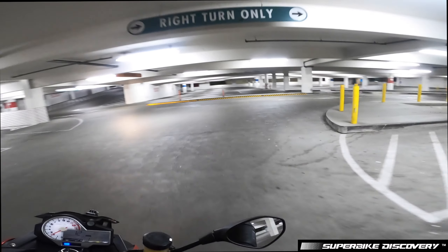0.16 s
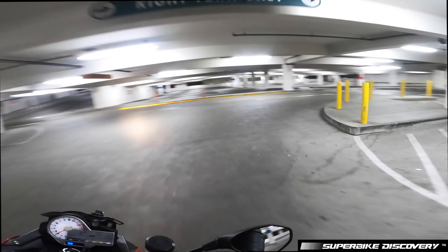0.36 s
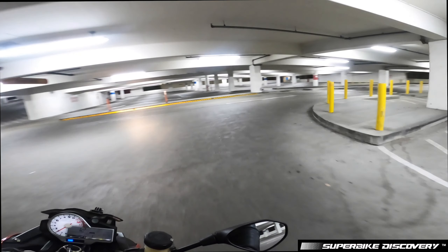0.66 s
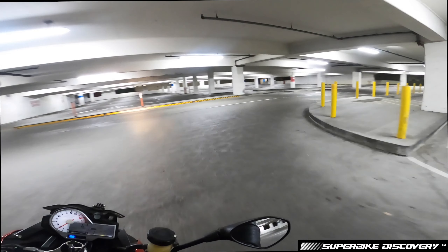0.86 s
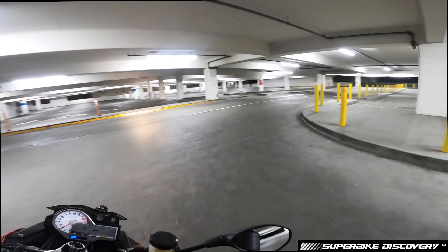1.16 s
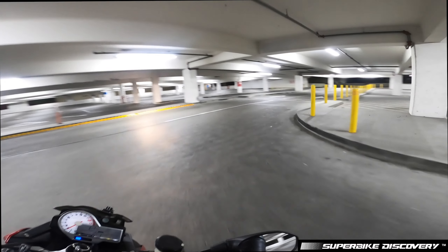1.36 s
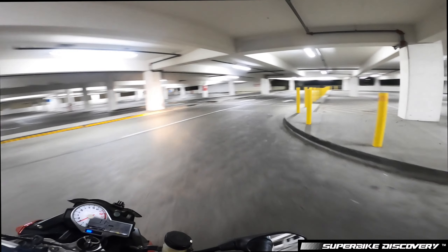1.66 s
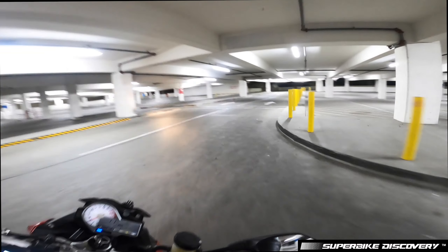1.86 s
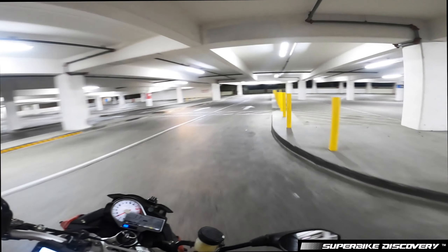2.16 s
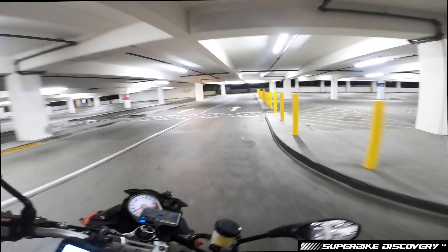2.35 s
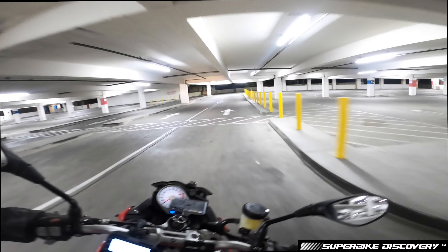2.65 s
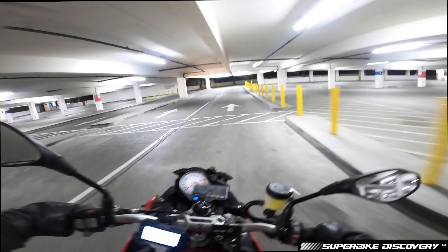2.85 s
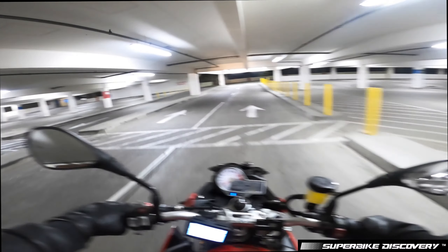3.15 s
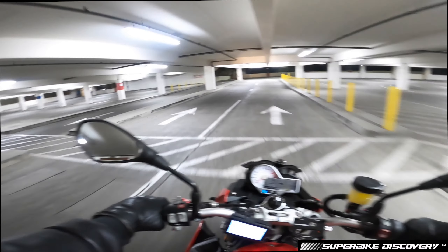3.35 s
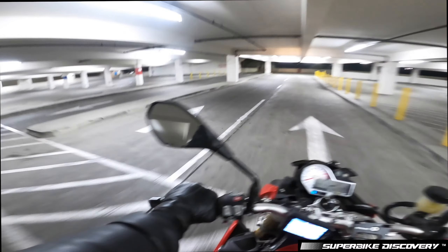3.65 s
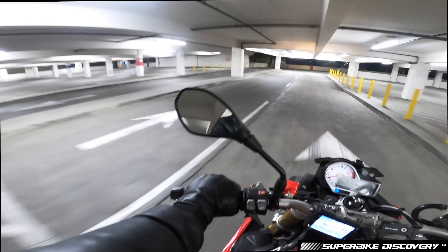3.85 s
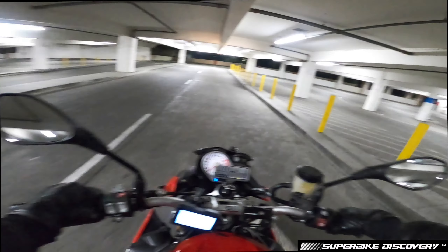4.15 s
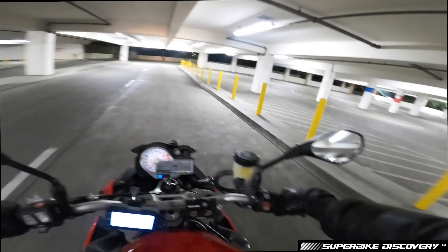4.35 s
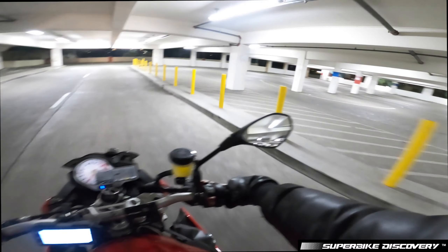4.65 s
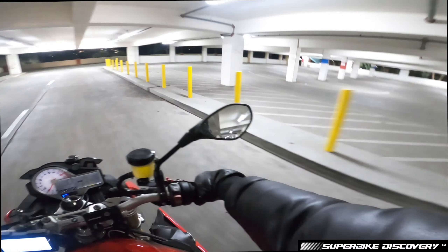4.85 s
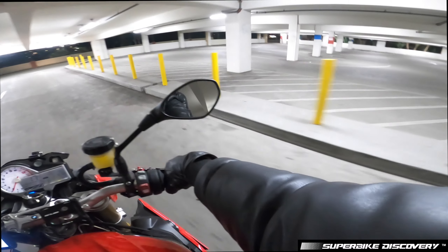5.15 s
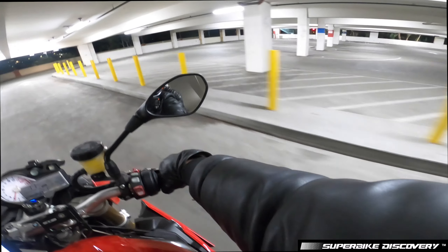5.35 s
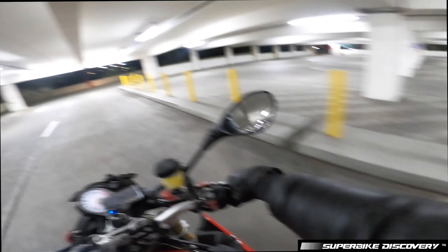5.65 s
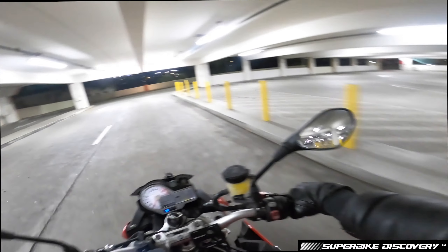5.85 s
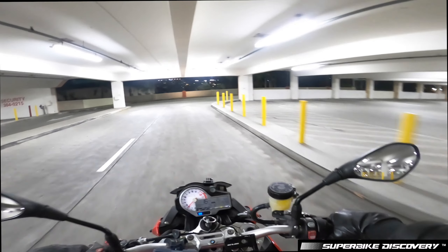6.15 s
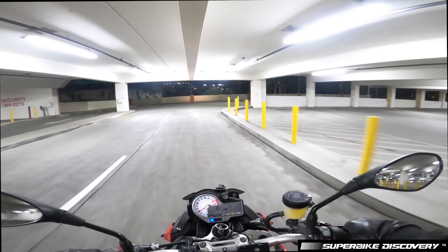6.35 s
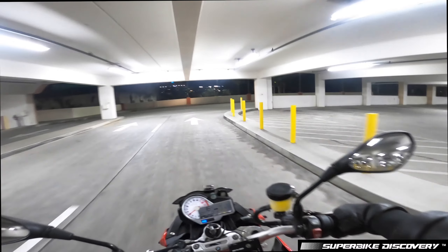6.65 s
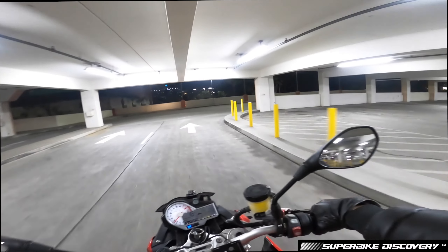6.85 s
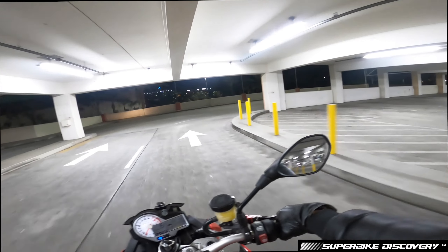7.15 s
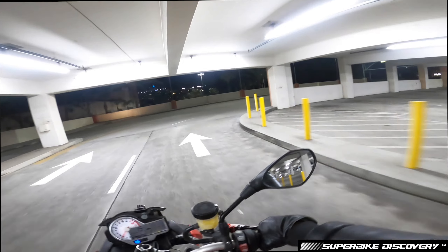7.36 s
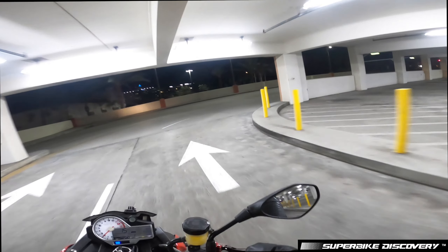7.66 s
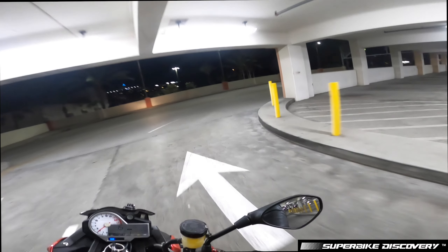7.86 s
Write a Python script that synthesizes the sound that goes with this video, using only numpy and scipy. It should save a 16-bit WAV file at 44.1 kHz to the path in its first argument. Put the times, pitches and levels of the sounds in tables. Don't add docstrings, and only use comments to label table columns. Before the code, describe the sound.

A four-cylinder motorcycle hums low and uneven through a concrete garage, blipping its throttle twice, under a broad helmet hiss.

```python
import sys
import numpy as np
from scipy import signal
from scipy.fft import rfft, irfft, next_fast_len
from scipy.io import wavfile
from scipy.ndimage import uniform_filter1d, map_coordinates

SR = 44100
rng = np.random.default_rng(int(sys.argv[2]) if len(sys.argv) > 2 else 0)


def to_linear_factor(level_db):
    exponent = np.asarray(level_db, float) / 20
    return 10 ** exponent


def materialize(psi):
    bounded = np.clip(np.atleast_2d(psi).T, -1, 1)
    quanta = np.round(bounded * 32767).astype(np.int16)
    wavfile.write(sys.argv[1], SR, quanta)


N = 352800

# start in
# seconds, end in seconds, first pitch in Hz, last pitch in Hz, level in dB.
HOLLOWS = [(0.03, 4.2, 1080, 1081, -43), (4.1, 5.57, 1076, 1077, -36), (5.4, 6.5, 1078, 1081, -39),
           (6, 7.4, 1085, 1086, -44.5), (-.2, 0.2, 3010, 2990, -32), (.12, 0.46, 2900, 2620, -40),
           (.1, 0.5, 3850, 3520, -40.5), (.3, 1.15, 4420, 4530, -45), (1.2, 2.4, 735, 745, -42.5),
           (.87, 1.74, 3035, 3045, -39.5), (1.7, 2.1, 2960, 2970, -42), (.95, 1.6, 4030, 4150, -44),
           (1.55, 2.4, 4110, 4280, -43), (2.1, 2.55, 4400, 4450, -47), (1.05, 2.35, 2485, 2525, -41),
           (.5, 1.3, 2900, 3370, -50), (1.65, 2.6, 3330, 3610, -42), (2.38, 2.9, 2930, 3030, -39),
           (2.96, 3.52, 3015, 3075, -43.5), (2.65, 3.75, 4250, 4140, -44), (2.6, 3.3, 1920, 1880, -39.5),
           (2.61, 3.31, 2115, 2165, -42), (3.35, 4.2, 2420, 2500, -38), (3.84, 4.31, 1805, 1815, -40.5),
           (3.85, 4.75, 4110, 4190, -43.5), (4.15, 4.85, 3030, 2950, -36.5),
           (4.84, 5.52, 3070, 3150, -40.5), (5.3, 6.0, 3330, 3430, -44), (4.79, 5.7, 2175, 2155, -43),
           (4.8, 5.9, 4120, 4150, -45), (4.9, 5.7, 780, 760, -41), (5.95, 6.6, 4220, 4160, -40),
           (6.7, 7.4, 2960, 2870, -46), (6.45, 7.05, 4200, 4100, -43.5), (6.9, 8.3, 3740, 3680, -47.5),
           (6.95, 7.7, 4790, 4600, -48), (7.2, 8.4, 4140, 4160, -48), (7.4, 8.6, 1943, 1923, -40.5),
           (-0.52, 2.6, 2030, 2040, -45), (6.0, 7.5, 1420, 1421, -44),
           (-.2, .5, 6850, 6700, -50.5), (.3, 1.5, 7200, 7050, -51), (-.2, .3, 7750, 7750, -51),
         (.4, .9, 6600, 6500, -52), (2.2, 2.9, 6450, 6550, -49.5), (2.4, 3.1, 6950, 7150, -49),
         (2.6, 3.5, 7350, 7550, -49.5), (2.9, 3.5, 6550, 6700, -51), (1.6, 2.1, 6850, 6850, -53),
         (3.4, 4.0, 4800, 5950, -50), (2.4, 4, 5750, 5500, -51.5), (3.5, 3.95, 5500, 5500, -51),
         (6.05, 6.6, 5500, 5550, -48), (6.2, 6.55, 6950, 7000, -52.5), (4.9, 5.4, 5250, 5450, -51),
         (4.6, 5.1, 4750, 4900, -49), (7.1, 8.2, 5500, 5450, -54), (.0, .5, 5100, 5200, -51),
         (.3, 1.0, 4200, 4300, -45.5), (4.9, 5.7, 3900, 3900, -44.5), (4.5, 5.1, 3500, 3450, -43.5),
         (4.3, 4.8, 3850, 3850, -47), (5.1, 5.9, 3550, 3500, -43.5), (6.05, 6.6, 2200, 2200, -40),
         (6.1, 6.55, 2850, 2880, -44), (6.0, 6.7, 2400, 2550, -46), (6.55, 6.95, 4500, 4300, -47.5),
         (.1, 1.0, 3480, 3400, -44.5), (2.7, 3.5, 3500, 3520, -45), (1.1, 2.0, 3400, 3350, -44),
         (2.4, 2.75, 4850, 5000, -49), (7.2, 7.8, 1800, 2150, -44.5), (3.3, 3.9, 1100, 1100, -43),
         (3.4, 3.9, 2250, 2300, -42.5)]
# pitch in Hz, density in dB per Hz.
WHIRR_COLOUR = [(500, -4.5), (740, -5), (880, -7), (1100, 0), (2150, -2), (2700, -2.5), (3300, -6),
                (3900, -4.5), (5600, -9), (7400, -11), (8600, -20), (10200, -8.5), (11500, -12),
                (15000, -13.5)]
# time in seconds, nearness to the engine in dB,
# facing it in dB, clearance of the shoulder in dB.
HEAD = [(0, -27, -11, -38), (.71, -31.5, -12.5, -35.5), (.95, -31.5, -14, -37.5), (1.3, -30.5, -13, -33.5),
        (2.24, -31.5, -13, -35), (2.74, -28, -13.5, -36.5), (3.23, -30, -12.5, -37.5),
        (3.72, -26.5, -15.5, -37), (3.95, -30, -17, -45), (4.45, -27.5, -20, -44), (4.8, -27.5, -18.5, -42),
        (5.2, -30.5, -16.5, -36.5), (5.6, -33, -16.5, -36), (5.96, -32, -17, -38.5),
        (6.28, -27, -17.5, -36.5), (6.7, -32.5, -17, -36), (6.97, -33.5, -18.5, -37.5),
        (8, -30.5, -18.5, -39.5)]
HEAD_HZ = [1100, 2800, 6200, 11000, 15000]
NEARNESS_SHARE = [.8, 0.85, 0.9, 0.92, 0.88]
FACING_SHARE = [-0.36, 0.018, 0.964, .05, .05]
SHOULDER_SHARE = [.01, .01, .01, .95, 1.6]
# start in seconds, end in seconds, pitch in Hz, width in Hz, share taken out (0-1).
SHADES = [(1.1, 2.7, 3880, 300, .55), (2.5, 3.6, 2780, 300, .5), (4, 6.2, 2700, 320, .5),
          (7, 8.2, 6150, 350, .5), (4.5, 5.6, 6150, 400, .35), (1.88, 2.6, 4950, 400, .4),
          (-0.35, 1.6, 5000, 250, .25), (-0.18, 1.6, 6100, 300, .3), (5.5, 6.6, 5050, 300, .35),
          (0, 0.89, 3950, 200, .3), (6, 6.6, 1800, 300, .35), (6.0, 6.7, 3000, 300, .3),
          (6.5, 7.3, 2650, 400, .3), (7.5, 8.2, 1300, 300, .35), (3.5, 6.4, 2020, 150, .3),
          (2.45, 2.5, 3200, 200, .35), (3, 4.2, 3900, 250, .3), (3, 4.2, 4900, 300, .25),
          (-2.5, 10, 8250, 650, .4), (0.5, 3.2, 12000, 1500, .3), (6, 7.8, 11300, 900, .3),
          (4, 5.3, 14000, 2000, .4)]
# time in seconds, share (0-1), delay in ms.
LEAN = [(0, 0.2, 2.0), (1.0, 0.16, 1.96), (2.3, 0.05, 2.035), (2.8, 0.16, 2.05), (3.6, 0.13, 1.95),
        (4.4, 0.03, 2.0), (6.3, 0.1, 2.05), (8, 0.17, 2.1)]
# time in seconds, peak in dB.
TICKS = [
    (4.5497, -20.5),
]
# pitch in Hz, level in dB, 60 dB decay time in seconds.
BUCKLE_MODES = [(3050, 0, .008), (4750, 3, .011), (5250, 4, .009), (5600, 0, .012), (7400, -9, .007),
                (9900, -13, .006), (11000, -17, .007), (13000, -23, .005)]
# time in seconds, peak in dB.
KNOCKS = [(2.235, -21), (2.297, -19), (2.354, -10.5), (2.413, -10.5), (2.470, -10), (2.527, -14.5),
          (2.583, -17), (2.675, -19), (2.791, -13), (2.839, -15.5), (2.887, -15), (2.937, -16.5),
          (2.988, -14.5), (3.036, -15), (3.086, -15), (3.239, -19), (3.341, -19.5), (3.391, -19),
          (3.439, -19)]
# pitch in Hz, width in Hz, level in dB.
BOOM = [(61.6, 36, -11.5), (105.93, 7, 4.5), (132.34, 21.8, 0.5), (156.2, 25.7, -3.5), (216, 42, -12)]
# pitch in Hz, width in Hz, level in dB.
RASP = [(266.5, 78.6, -2.5), (325, 24, 0), (374.8, 28.5, -5), (444.7, 43.4, 0.5), (557, 128, -8.5),
        (766, 73, -13)]
# time in seconds, effort in dB, evenness of burning in dB,
# bite of the 3rd and 4th harmonic in dB.
WORK = [(0, 2, 1.5, -5), (.33, 2, -3, 3.5), (.73, -4.5, 3, -2), (1.05, -4.5, -4, -2.5),
        (1.4, -0.5, -1, 2.5), (2.0, -3.5, 2, 3), (2.4, -2, -1.5, 2), (2.85, 3.5, 1.5, 1.5),
        (3.35, -2, 4, 0.5), (3.68, 4.5, -2.5, -0.5), (4.05, -0.5, -7.5, -14), (4.7, -1.5, -2.5, -6),
        (5.3, 1.5, -2, -8.5), (5.8, -4, -2, -4.5), (6.2, 5, -1.5, 0.5), (6.9, 1.5, -5, -6),
        (7.5, 0.5, 0, -2.5), (8, 1.5, 1, 8)]
# time in seconds, depth in dB, length in seconds.
PILLARS = [(0.408, 4, 0.05), (0.679, 10, .03), (0.889, 4.5, .03), (1.091, 11.5, 0.022), (1.86, 14.5, 0.023),
           (2.216, 3, 0.09), (2.517, 8.5, 0.028), (2.629, 10.5, 0.05), (3.002, 2.5, .04), (3.559, 0, 0.024),
           (4, 15, 0.048), (4.195, 4.5, 0.043), (4.352, 6, .03), (4.506, 10, 0.022), (4.755, 6, .03),
           (5.209, 16.5, 0.023), (5.536, 16.5, 0.038), (5.654, 11.5, .02), (5.813, 5, 0.022),
           (5.928, 6.5, 0.025), (6.664, -4.5, 0.019), (7.211, 1.5, 0.034), (7.498, 11.5, 0.024),
           (7.678, 4, .03), (7.899, 12, .16)]
PILLAR_SHARE = [0.17, 1, 0.34, 0.54]
# time in seconds, length in seconds, multiple of the firing rate, gain in dB.
BAYS = [(.4, 0.087, 3, 5.5), (2.4, 0.092, 3, 5.5), (2.58, .08, 3, 6), (3.3, .12, 3, 3.5),
        (3.13, .04, 3, -11), (4.62, 0.21, 3, 6), (6.5, .15, 3, -6.5), (7.9, 0.14, 3, 5.5), (.6, .12, 4, 3),
        (3.02, .1, 4, 3.5), (3.38, .14, 4, 4), (3.7, .11, 4, -3), (5.93, .06, 4, 8.5),
        (6.17, 0.067, 4, 6.5), (6.42, .11, 4, -7), (6.62, .06, 4, 3), (2.66, 0.071, 5, 6.5),
        (3.3, 0.17, 5, -5), (3.68, 0.11, 5, -8), (6.2, .1, 5, 4), (8.8, .08, 5, 4.5),
        (7.05, 0.27, 1.5, 12.5), (6.15, 0.047, 2, 7), (3.55, .04, 2, 5), (4.6, .15, 6, 5), (5.2, .3, 6, 7),
        (2.7, .06, 1, 5), (6.45, .06, 3, 4.5), (2.8, .08, 1, 1.5), (5.95, .05, 5, 1.5), (3.69, .1, 3, -1),
        (3.68, 0.087, 2, -5), (.05, .08, 3, 5.5), (1.63, .06, 3, 4), (5.3, .12, 3, -4.5), (5.2, .3, 5, -4),
        (6.56, 0.046, 2, -7), (6.37, 0.063, 2, 2.5), (2.1, .2, 7, 5), (3.0, .08, 5, 3),
        (3.87, .035, 5, 4.5), (2.5, .12, 7, 5.5), (2.9, .2, 2, 1), (3.7, .12, 1, -2), (6.4, .2, 1, 2),
        (6.35, .15, 5, -7), (3.55, .04, 4, 4), (1.5, 0.34, 3, -3), (3.9, .07, 4, -5.5), (4.05, .04, 2, 3),
        (6.42, .12, 3, 2), (3.7, .1, 3.5, 17.5), (1.45, .25, 5, 4.5)]
# time in seconds, firings per second.
CREEP = [(0, 78.3), (.55, 64.6), (1.0, 60.3), (1.25, 63), (1.62, 62.6), (1.9, 65.2), (2.5, 68.8),
         (2.82, 81.5), (2.93, 79.8), (3.04, 82.5), (3.21, 77.8), (3.47, 82), (3.75, 62), (4.08, 62.5),
         (4.25, 56.3), (5.88, 63.8), (6.4, 73.5), (8, 71.2)]
# start in seconds, rise in seconds, top in firings per second,
# length of the bell-shaped fall in seconds.
BLIPS = [
    (3.49, .17, 112, .2),
    (5.98, .42, 108.6, .3),
]
# multiple of the firing rate, level in dB.
OVERTONES = [(.5, -12), (1.5, -3), (2.5, -1), (3.5, -26), (5, -1), (6, -4.5), (7, -5.5), (8, -7)]
# pitch in Hz, level in dB.
SILENCER = [(55, -21.5), (80, -19.5), (105, -13), (130, -11.5), (172, -14.5), (192, -25.5), (260, -26),
            (330, -22)]
MULTIPLE_DB = [-0.85, -0.16, -2.5, -2.5]
HUM_WAVER_DB = [1.6, 1.2, 2.4, 1.3]


def rms_one(x):
    return x / np.sqrt(np.mean(x ** 2) + 1e-20)


def in_time(rows):
    s, *columns = np.transpose(rows)
    return [np.interp(np.arange(N) / SR, s, c) for c in columns]


def bump(s, length):
    return np.exp(-((np.arange(N) / SR - s) / length) ** 2)


def drift(rate):
    r = np.exp(-80 * np.pi * rate / SR)
    slow = signal.lfilter([1], [1, -2 * r, r * r], rng.standard_normal(N // 40 + 2002))[2000:]
    return np.interp(np.arange(N) / 40, np.arange(len(slow)), rms_one(slow))


def lowpass(x, order, hz):
    return signal.sosfilt(signal.butter(order, hz, fs=SR, output="sos"), x)


def resonance(x, hz, width):
    r = np.exp(-np.pi * width / SR)
    top = np.array([1, 0, -1]) * (1 - r * r) / 2
    return signal.lfilter(top, [1, -2 * r * np.cos(2 * np.pi * hz / SR), r * r], x)


def pipe(x, modes):
    rung = [(-1) ** k * to_linear_factor(db) * resonance(x, hz, w) for k, (hz, w, db) in enumerate(modes)]
    return rms_one(sum(rung))


def garage(x):
    t60_s, cut_hz = 1.276, 2500
    size = next_fast_len(N + 2 * SR)
    w = 2 * np.pi * np.arange(size // 2 + 1) / size
    combs = 0
    for k, lag in enumerate(rng.uniform(.025, .07, 8) * SR):
        loop = to_linear_factor(-60 * lag / SR / t60_s) * np.exp(-1j * w * lag)
        combs = combs + (-1) ** k * loop / (1 - loop)
    echoes = irfft(rfft(x, size) * combs, size)[:N]
    return lowpass(echoes, 4, cut_hz) / np.sqrt(8)


def hollows():
    width_hz = 110
    out, waver, flicker = np.zeros(N), drift(2.984), drift(7.2)
    for k, (start, end, hz, end_hz, db) in enumerate(HOLLOWS):
        a, b = max(round(start * SR), 0), min(round(end * SR), N)
        way = (np.arange(a, b) / SR - start) / (end - start)
        shift = k * SR // 3
        pitch = hz + (end_hz - hz) * way + 28 * np.roll(waver, shift)[a:b]
        phase = 2 * np.pi * np.cumsum(pitch) / SR
        wander = lowpass(rng.standard_normal((2, b - a)), 2, width_hz / 2)
        tone = rms_one(wander[0] * np.cos(phase) + wander[1] * np.sin(phase))
        fade = np.clip(np.sin(np.pi * way) * 1.85, 0, 1)
        out[a:b] += to_linear_factor(db + 0.5 + 1.5 * np.roll(flicker, shift)[a:b]) * fade * tone
    return lowpass(out, 4, 5500)


def shade(x):
    t = np.arange(N) / SR
    for start, end, hz, width, share in SHADES:
        presence = np.sin(np.pi * np.clip((t - start) / (end - start), 0, 1)) ** .5
        x = x - np.clip(share, 0, .5) * presence * resonance(x, hz, width)
    return x


def glance(x):
    tank_ms, tank_share = .96, .12
    dash_share, dash_ms = in_time(LEAN)
    dull = lowpass(x, 1, 4000)
    tank, dash = [map_coordinates(dull, [np.arange(N) - ms * SR / 1000], order=3)
                  for ms in (tank_ms, dash_ms)]
    return x + tank_share * tank + dash_share * dash


def whirr(firings):
    near_db, facing_db, clear_db = [c - np.mean(c) for c in in_time(HEAD)]
    turns = 2 * np.pi * firings
    beat = 1 + 0.11 * np.cos(turns) + 0.09 * np.cos(2 * turns) + 0.057 * np.cos(turns / 4)
    white = rng.standard_normal((2, N)) * beat
    out, together = 0, drift(45.0)
    edges = 520 * 2 ** np.arange(0, 5.1, 1 / 3)
    colour_hz, colour_db = np.transpose(WHIRR_COLOUR)
    for k, (low, high) in enumerate(zip(edges, edges[1:])):
        third = signal.butter(3, [low, high], "band", fs=SR, output="sos")
        band = signal.sosfilt(third, white[k % 2])
        log_hz = np.log(np.sqrt(low * high))
        level_db = np.interp(log_hz, np.log(colour_hz), colour_db) - 19
        near, facing, clear = [np.interp(log_hz, np.log(HEAD_HZ), share)
                               for share in (NEARNESS_SHARE, FACING_SHARE, SHOULDER_SHARE)]
        head_db = near * near_db + facing * facing_db + clear * clear_db
        out = out + band * to_linear_factor(level_db + head_db + 0.24 * together + .5 * drift(2.6))
    return glance(shade(lowpass(out, 3, 4500)))


def buckle():
    out, t = np.zeros(N), np.arange(600) / SR
    ring = sum(to_linear_factor(db) * np.sin(2 * np.pi * hz * t) * to_linear_factor(-60 * t / t60) for hz, db, t60 in BUCKLE_MODES)
    ring = ring * (1 - np.exp(-t / 0.0004))
    for s, db in TICKS:
        at = round(s * SR)
        out[at:at + 600] += to_linear_factor(db) * ring
    return out


def knocks():
    out, t = np.zeros(N), np.arange(2000) / SR
    modes = np.sin(2 * np.pi * 490 * t) + 0.36 * np.sin(2 * np.pi * 570 * t)
    ring = modes * (1 - np.exp(-t / 0.0007)) * np.exp(-t / 0.00494)
    for s, db in KNOCKS:
        at = round(s * SR)
        out[at:at + 2000] += to_linear_factor(db - 0.5) * ring
    return out


def pillar_loss():
    return sum(depth * bump(s, length) for s, depth, length in PILLARS)


def bays(multiple):
    return sum(db * bump(s, length) for s, length, which, db in BAYS
               if round(2 * which) == round(2 * multiple))


def uneven(firings):
    effort_db, even_db, _ = in_time(WORK)
    boom_db = -23 - 0.92 * even_db - 0.36 * pillar_loss()
    rasp_db = -28.5 + 0.68 * effort_db
    tail_db = -31 + 0.76 * effort_db + 5.5 * bump(5.15, 0.9)
    boom = pipe(rng.standard_normal(N), BOOM)
    turns = 2 * np.pi * firings
    beat = 1 + 0.37 * np.cos(turns) + 0.23 * np.cos(turns / 4) + .15 * np.cos(turns / 2)
    puffs = rng.standard_normal((2, N)) * beat
    rasp = pipe(puffs[0], RASP)
    tail = rms_one(resonance(resonance(puffs[1], 364.6, 35), 375.4, 50))
    upper = lowpass(to_linear_factor(rasp_db) * rasp + to_linear_factor(tail_db) * tail, 4, 1300)
    return to_linear_factor(boom_db) * rms_one(lowpass(boom, 3, 650)) + upper


def speed():
    crank_lag_s = .05
    rate, t, free = in_time(CREEP)[0], np.arange(N) / SR, 0
    for s, rise_s, top_hz, fall_s in BLIPS:
        rise = np.sin(np.pi / 2 * np.clip((t - s) / rise_s, 0, 1))
        fall = np.exp(-(np.clip(t - s - rise_s, 0, None) / fall_s) ** 2)
        pulled = rise * fall
        rate, free = rate + pulled * (top_hz - rate), free + pulled
    hunt = .007 * drift(7.0) + .008 * np.sqrt(free) * drift(14.0)
    return uniform_filter1d(rate, size=round(crank_lag_s * SR), mode="nearest") * (1 + hunt)


def overtones(firings, rate):
    effort_db, even_db, _ = in_time(WORK)
    pull_s = 2.56 + np.cumsum([0, 0.1, 0.33, .2])
    pull_db = np.interp(np.arange(N) / SR, pull_s, [0, 5, 5, 0])
    out = 0
    for multiple, db in OVERTONES:
        hz = multiple * rate
        pipe_db = 7.1 * np.exp(-((hz - 370) / 60) ** 2) - 10.0 * np.clip(np.log2(hz / 400), 0, 3)
        level_db = db - 32.5 + pipe_db + bays(multiple) + 0.53 * effort_db + 3.12 * drift(1.5)
        if multiple > 4:
            level_db = level_db + pull_db * (5 / multiple) ** 2.5
        else:
            level_db = level_db - 0.67 * even_db * (multiple < 4)
        out = out + to_linear_factor(level_db) * np.sin(2 * np.pi * multiple * firings + rng.uniform(0, 2 * np.pi))
    return out


def hum(firings, rate):
    effort_db, even_db, bite_db = in_time(WORK)
    cancel_db = pillar_loss()
    hz, db = np.transpose(SILENCER)
    out = 0
    for k, drive_db in enumerate((.3 * even_db, even_db, bite_db, bite_db)):
        multiple = k + 1
        silencer_db = np.interp(np.log(multiple * rate), np.log(hz), db)
        work_db = MULTIPLE_DB[k] + 0.39 * effort_db + drive_db
        ramp_db = bays(multiple) - PILLAR_SHARE[k] * cancel_db
        level_db = silencer_db + work_db + ramp_db + HUM_WAVER_DB[k] * drift(7.8)
        wave = np.sin(2 * np.pi * multiple * firings + rng.uniform(0, 2 * np.pi))
        out = out + np.sqrt(2) * to_linear_factor(level_db) * wave
    return out


def scene():
    rate = speed()
    firings = np.cumsum(rate) / SR
    exhaust = hum(firings, rate) + overtones(firings, rate)
    engine = exhaust + to_linear_factor(-12.5) * garage(exhaust) + uneven(firings) + knocks()
    return (engine + whirr(firings) + hollows() + buckle())[None]


def low_pass(x):
    return signal.sosfilt(signal.butter(12, 15140, fs=SR, output="sos"), x)


def record(dry):
    fade_in = np.sin(np.pi / 2 * np.clip(np.arange(N) / SR / .002 + .15, 0, 1))
    x = signal.sosfilt(signal.butter(1, 25, "high", fs=SR, output="sos"), dry * fade_in)
    return low_pass(1.1 * np.tanh(x / 1.1))


dry = scene()
out = record(dry)
materialize(out)
```